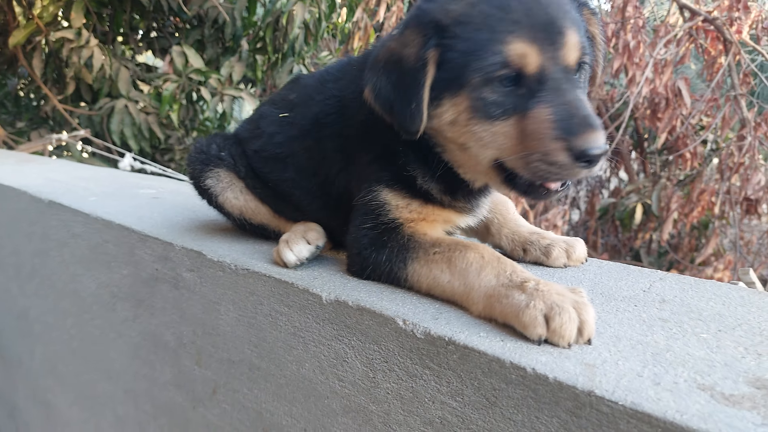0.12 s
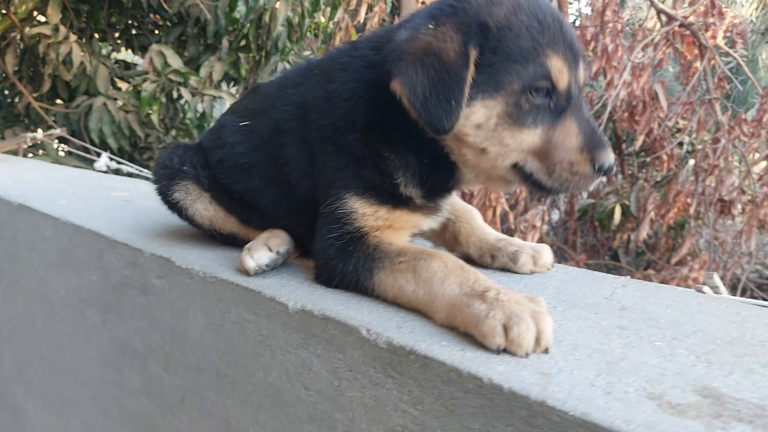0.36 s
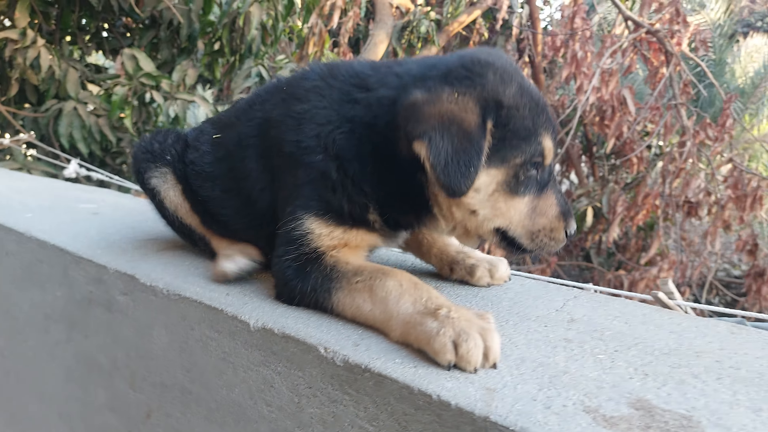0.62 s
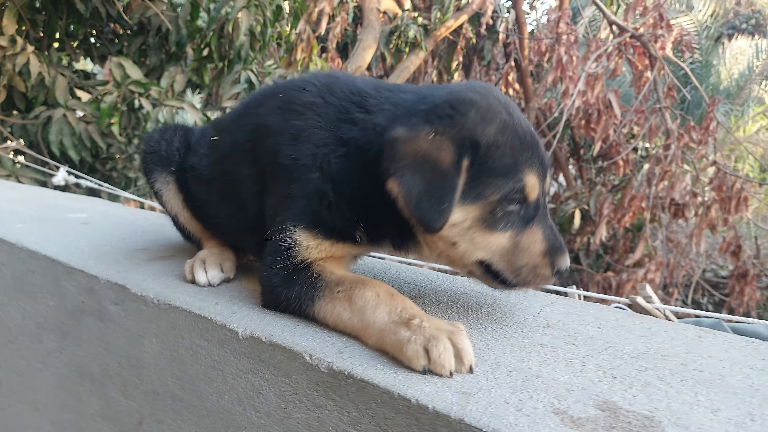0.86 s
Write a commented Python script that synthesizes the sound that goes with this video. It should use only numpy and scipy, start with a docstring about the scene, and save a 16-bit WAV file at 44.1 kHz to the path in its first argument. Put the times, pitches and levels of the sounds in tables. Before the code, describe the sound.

A puppy whimpers very close to a stereo phone microphone outdoors. The first cry is loudest, leaping up, then sliding down; a second follows, then weaker, shorter whines. After a pause with a gasp and tiny wet mouth ticks, a clear whine leads to two higher, stronger yelps. A very high whistle edges the voice. Leaf rustle, faint distant tones and low wind knocks lie behind, with a slight echo from nearby walls.

```python
"""Outdoors on a concrete ledge, a puppy lies and whimpers in short falling cries, close to a phone with two microphones.
Its vocal folds sing a stack of sine overtones; a very high whistle, chopped at the fold pitch, beats against them.
Gasps and one tiny low grunt, all of filtered noise, and tiny wet ticks fall among the cries.
Nearby walls add echoes and a short noise tail. Behind lie banded noise for rustling distance, faint far tones,
and low wind noise with knocks on the left port."""
import sys
import numpy as np
from scipy import signal
from scipy.fft import rfft, irfft, next_fast_len
from scipy.io import wavfile
from scipy.ndimage import uniform_filter1d

SR = 44100
rng = np.random.default_rng(int(sys.argv[2]) if len(sys.argv) > 2 else 0)


def ratio(d):
    """dB to gain"""
    e = np.asarray(d, float) / 20
    return 10 ** e


def wav_out(sig):
    """Save sig, one row per channel (or a flat mono array), as 16-bit PCM at SR to the path in sys.argv[1]."""
    wavfile.write(sys.argv[1], SR, np.round(np.clip(np.atleast_2d(sig).T, -1, 1) * 32767).astype(np.int16))


N = 271210
T = np.arange(N) / SR


def across(table, hz, column):
    """Read a spectrum table on a log-frequency axis."""
    rows = np.transpose(table)
    return np.interp(np.log(np.maximum(hz, 1)), np.log(rows[0]), rows[column])


def band(x, lo_hz, hi_hz):
    """Band-pass scaled to rms 1."""
    sos = signal.butter(2, [lo_hz, min(hi_hz, .45 * SR)], "bandpass", fs=SR, output="sos")
    y = signal.sosfilt(sos, x)
    return y / np.std(y)


def walk(rate, size=N):
    """Smooth random wander, spread near 1, from about rate new random values a second."""
    k = int(SR / rate)
    steps = np.repeat(rng.standard_normal(size // k + 1), k)
    return 1.66 * uniform_filter1d(uniform_filter1d(steps, k), k)[:size]


def play(table, attack_s, release_s):
    """Sample span, fade and interpolated columns of one call, swelling out of silence and dying back into it."""
    edge_db = -26  # level lost across each edge, on top of the fade
    s, *columns = np.transpose(table)
    span = slice(max(int((s[0] - attack_s) * SR), 0), int((s[-1] + release_s) * SR))
    before = (s[0] - T[span]) / attack_s
    after = (T[span] - s[-1]) / release_s
    edge = np.clip(np.maximum(before, after), 0, 1)
    hz, db, *rest = [np.interp(T[span], s, c) for c in columns]
    fade = np.clip(5 * (1 - edge), 0, 1)
    return span, fade, [hz, db + edge_db * edge, *rest]


def add(out, x, s):
    """Mix x in at time s."""
    i = int(s * SR)
    out[i:i + len(x)] += x[:N - i]


def notes(table):
    """Soft, slightly unsteady sine tones."""
    out = np.zeros(N)
    for s, length, hz, db in table:
        size = int(length * SR)
        turn = 2 * np.pi * np.cumsum(hz * (1 + 0.013 * walk(25, size))) / SR
        level = ratio(db + 1.8 * walk(34.0, size)) * np.sqrt(np.hanning(size))
        add(out, np.sqrt(2) * level * np.sin(turn), s)
    return out


# right microphone against the left: (frequency [Hz], level [dB], phase lead [rad])
RIGHT_PORT = [(706.4, 5.5, -0.38), (1010, 5, -1.1), (1290, -3, -1.3), (1450, -0.5, 0.39), (2020, 8, -0.27),
              (3100, 7.5, 0.48), (4800, 15, -0.099), (6350, -1, 1.1), (7300, -2, 2.1), (8100, 0.5, 3.7),
              (12000, 7, 4.5)]


def ports(x, pan_db, lead_ms):
    """One source at the two ports: level and phase differences, split evenly between left and right."""
    size = next_fast_len(len(x) + 512)
    hz = np.arange(size // 2 + 1) * SR / size
    turn = across(RIGHT_PORT, hz, column=2) + 2 * np.pi * hz * lead_ms / 1000
    half = ratio((across(RIGHT_PORT, hz, column=1) - pan_db) / 2) * np.exp(.5j * turn)
    spectrum = rfft(x, size)
    return np.array([irfft(spectrum / half, size), irfft(spectrum * half, size)])[:, :len(x)]


# the folds lose their beat for a moment and rasp:
# (time [s], length [s], phase scatter at its height [rad per overtone number])
BREAKS = [(0.315, 0.055, 0.296), (2.712, 0.035, 0.46)]


def fold_rasp():
    """How far the folds stumble at each moment, as a depth of phase scatter."""
    rasp = np.zeros(N)
    for s, length, rad in BREAKS:
        add(rasp, rad * np.sqrt(np.hanning(int(length * SR))), s)
    return rasp


# one table a cry: (time [s], fold pitch [Hz], fundamental level [dB], overtone offset [dB], mouth resonance [Hz])
CRIES = [
    [(0.0, 958, -11, 6.5, 3270), (0.027, 1149, -8, -3.5, 3510), (0.052, 1428, -17, 4, 2100),
     (0.054, 1639, -17.5, 5, 3550), (0.07, 1600, -18.5, 3.5, 3500), (0.086, 1550, -18.5, -5, 3460),
     (0.101, 1319, -16.5, 3.5, 3040), (0.164, 1333, -13, 2.5, 2920), (0.25, 1279, -20.5, 6.5, 3050),
     (0.27, 1186, -21.5, 14, 3150), (0.308, 1100, -22.5, 7, 3050), (0.345, 778, -29, 4, 2740),
     (0.368, 681, -31, -1.5, 2820)],
    [(0.55, 956.5, -26, 1.5, 2680), (0.568, 986, -24, 2.5, 3050), (0.59, 1151, -13, -2, 3130),
     (0.602, 1222, -24.5, -15, 2240), (0.604, 1425, -22, 2, 2440), (0.65, 1316, -28, -2, 2600),
     (0.661, 1113, -26.5, 5, 2800), (0.766, 1055, -28.5, 10, 2850), (0.778, 1027, -22.5, 6, 2910),
     (0.858, 939, -20, -0.5, 2930), (0.892, 789.6, -17, -15, 2430)],
    [(1.07, 1172, -37.5, 8.5, 2670), (1.112, 1281, -40.5, 16, 2700), (1.224, 1130, -36, 6.5, 2050),
     (1.238, 903, -33.5, 11.5, 2300), (1.272, 938, -27, 0.5, 2210), (1.286, 860, -28, -13, 2340)],
    [(1.472, 778, -34, -10.5, 2020), (1.51, 882, -25, -14.5, 1994)],
    [(1.697, 780.6, -29.5, -18, 2180), (1.741, 1035, -28.5, -9.5, 2100), (1.775, 1156, -25.5, -10, 2370),
     (1.841, 1120, -19, -7.5, 2480), (1.871, 1027, -29.5, -10, 1770), (1.908, 952, -34.5, -3, 2280)],
    [(2.272, 755, -35.5, -24, 2210), (2.302, 1033, -30.5, -6, 2120), (2.328, 1017, -26.5, -6, 2100),
     (2.342, 909, -22.5, -14, 2100)],
    [(2.528, 671.7, -43.5, 4.5, 2320), (2.546, 727.6, -30.5, -27, 2490), (2.572, 1006, -28, -10.5, 2030),
     (2.65, 961, -21, -11, 2070), (2.672, 883, -22, -5.5, 2430), (2.712, 834.4, -22.5, -11, 2190),
     (2.726, 931, -22, -6.5, 1980), (2.746, 855, -25, -12, 2630), (2.754, 728.5, -27, -1.5, 2600),
     (2.782, 796.5, -18, -23, 2760), (2.798, 777, -33, 0, 2530)],
    [(3.309, 668, -44.5, -2, 2500), (3.338, 954, -33, -16, 2020), (3.394, 1056, -28.5, -0.5, 1900),
     (3.41, 1097, -22, -9.5, 2400), (3.46, 1077, -23.5, 1.5, 2350), (3.496, 952, -28.5, -7, 2180),
     (3.52, 950, -38.5, 0, 2610)],
    [(4.826, 1101, -25, -7, 1960), (4.858, 1134, -32, -14, 2620), (4.932, 1115, -18.5, -5.5, 2120),
     (4.975, 1067, -21.5, -5.5, 2220), (5.112, 1019, -28, 4.5, 2470), (5.132, 980, -20.5, -6.5, 2350),
     (5.142, 778, -30, -12, 2820)],
    [(5.415, 1494, -24.5, -10, 1240), (5.47, 1470, -22, -7.5, 2060), (5.485, 1448, -18.5, -0.5, 2190),
     (5.578, 1406, -18, -4.5, 2550), (5.6, 1317, -26, -2, 2700), (5.61, 1094, -21, -15, 2300),
     (5.62, 810, -22.5, -5, 2270)],
    [(5.804, 1406, -27.5, 6, 2850), (5.838, 1471, -17, -3.5, 2800), (5.874, 1443, -17, -3.5, 2800),
     (5.89, 1434, -15, 3, 2870), (5.926, 1395, -16, 1, 2800), (5.975, 1348, -23.5, -4, 2650),
     (5.992, 1208, -22.5, -5, 2570), (6.005, 917, -20, -29, 2510)],
]
# head angle and voice colour in each cry: (left minus right [dB], right lead [ms], hoarseness before slides [dB],
# treble tilt [dB per octave], throat [Hz], its lift or dip [dB])
HEAD = [(7, 0.04, -36, 2, 4000, 6), (5, 0.092, -37, 2.5, 4560, 6), (5, .12, -25.5, 4.5, 3600, -7.5),
        (1.5, 0.057, -36.5, -2.4, 3400, -7), (5, 0.036, -36.5, 9.5, 4400, 1),
        (2.5, 0.045, -31, -8, 3400, 9), (5.5, 0.039, -29, 8, 3660, 7.5), (7, .05, -30, -4.5, 3700, 4.5),
        (8.5, 0.025, -33.5, -2, 5200, -12), (1.5, .165, -37.5, 4.5, 6300, 10),
        (2, .17, -35, 6.5, 4100, -10)]
# colour of the overtones against the fundamental: (frequency [Hz], level [dB])
MOUTH = [(1300, 0.5), (1800, -22), (2400, -29.5), (3200, -24), (4200, -29), (5000, -36.5), (5700, -41),
         (7000, -48.5), (9000, -44.5), (12000, -52), (15500, -54.5)]


def overtone_db(hz, over_db, mouth_hz, tilt_db, throat_hz, throat_db):
    """Level of an overtone against the fundamental; mouth and throat lift or dip whatever lies near them."""
    high_db = over_db + across(MOUTH, hz, column=1)
    high_db += tilt_db * np.maximum(np.log2(hz / 3320), 0)  # tilts only above 3320 Hz
    high_db += 19.5 / (1 + (np.log2(hz / mouth_hz) / 0.17) ** 2)  # peak dB, half width in octaves
    return high_db + throat_db / (1 + (np.log2(hz / throat_hz) / 0.21) ** 4)


def cries():
    """Vocal folds sing 18 harmonics with hoarse air; also returns fold phase and how firmly they sound."""
    blur_rad_per_octave_s, blur_most_rad, blur_from_hz = .2, 1.8, 4600
    voice, phase, voiced = np.zeros(N), np.zeros(N), np.zeros(N)
    rasp = fold_rasp()
    for cry, (_, _, hoarse_db, tilt_db, throat_hz, throat_db) in zip(CRIES, HEAD):
        span, fade, (hz, db, over_db, mouth_hz) = play(cry, attack_s=.009, release_s=0.0074)
        size = len(fade)
        slide = uniform_filter1d(np.abs(np.gradient(np.log2(hz))) * SR, size=800)  # octaves a second
        blur = np.clip(blur_rad_per_octave_s * slide, 0, blur_most_rad)
        phase[span] = 2 * np.pi * np.cumsum(hz * (1 + 0.0025 * walk(150, size))) / SR
        voiced[span] = fade * np.clip(ratio(db + 43.5), 0, 1)
        tone = np.sin(phase[span])
        stumble = rasp[span] * walk(500, size)
        for k in range(2, 19):
            high_db = overtone_db(k * hz, over_db, mouth_hz, tilt_db, throat_hz, throat_db)
            high_db += min(.55 * k, 2.2) * walk(45, size)
            # a sliding pitch smears the high overtones
            smear = blur * np.clip((k * hz - blur_from_hz) / 2500, 0, 1) * walk(1100, size)
            turn = k * phase[span] + k * k + smear + k * stumble
            tone += (k * hz < 16000) * ratio(high_db) * np.sin(turn)
        # turbulent air, puffed once a fold cycle; sliding and rasping roughen it
        puffs = 1 + 0.66 * np.sin(phase[span])
        air_db = hoarse_db + 3.5 * (blur + 1.1 * rasp[span])
        air = ratio(air_db) * band(rng.standard_normal(size), 700, 5200) * puffs
        voice[span] = fade * ratio(db + 0.31 * walk(90, size)) * (np.sqrt(2) * tone + air)
    return voice, phase, voiced


# one table a whistle: (time [s], pitch [Hz], level of the pure tone [dB])
WHISTLES = [
    [(0.056, 8940, -40.5), (0.09, 8410, -48), (0.125, 8330, -48)],
    [(0.572, 7880, -60), (0.596, 8180, -44.5), (0.61, 8600, -40)],
    [(1.07, 7330, -56), (1.09, 7760, -45), (1.22, 7450, -44), (1.25, 8030, -61.5), (1.272, 8160, -42.5),
     (1.282, 9090, -40.5)],
    [(1.475, 7840, -58.5), (1.5, 7890, -56.5), (1.515, 8800, -45.5)],
    [(1.711, 8150, -58), (1.765, 7460, -41.5), (1.787, 8540, -48), (1.877, 8630, -55.5),
     (1.899, 8890, -54.5)],
    [(2.29, 7400, -62), (2.33, 7610, -56), (2.345, 8580, -53)],
    [(2.557, 7510, -56.5), (2.627, 7570, -49.5), (2.675, 8200, -53.5), (2.77, 7965, -58),
     (2.79, 8540, -51.5), (2.81, 7910, -56.5)],
    [(3.345, 7660, -55), (3.37, 8430, -58), (3.426, 7895, -55), (3.518, 7880, -51.5), (3.55, 7820, -60)],
    [(4.791, 7270, -39), (4.861, 7035, -25), (4.873, 7455, -27), (4.932, 7350, -32), (4.942, 7170, -33),
     (5.125, 7106, -37), (5.14, 7630, -46)],
    [(5.365, 7210, -43), (5.387, 7960, -42.5), (5.459, 7570, -43), (5.589, 7390, -26), (5.608, 7115, -34),
     (5.615, 7840, -32)],
    [(5.806, 7960, -43), (5.896, 8110, -34), (5.992, 7910, -44.5), (6.005, 8160, -37)],
]
# lines at the whistle pitch plus multiples of fold pitch: (multiple [fold pitches], relative level [dB])
SIDE_LINES = [(-2, -16.5), (-1, 0), (1, -2), (2, -10.5), (3, -17)]
# for each whistle, against its pure tone: (side lines [dB], octave [dB], jet hiss [dB])
WHISTLE_MIX = [(-7, -21.5, -5.5), (-15.5, -17, -26), (-14, -8, -14.5), (-3, -21, -9), (-12, -17, -12),
               (-8.5, -26.5, 2), (-6, -21.5, -6.5), (-11, -24.5, -10.5), (-31.5, -31, -32.5),
               (-20.5, -17, -23.5), (-11, -17.5, -22.5)]


def whistles(phase, voiced):
    """A high whistle with its octave and jet hiss, chopped into side lines by the vibrating folds."""
    out = np.zeros(N)
    for whistle, (side_db, octave_db, hiss_db) in zip(WHISTLES, WHISTLE_MIX):
        span, fade, (hz, db) = play(whistle, attack_s=0.029, release_s=0.02)
        size = len(fade)
        pitch = uniform_filter1d(hz, size=300) * (1 + 0.0044 * walk(110, size))
        turn = 2 * np.pi * np.cumsum(pitch) / SR
        lines = sum(ratio(d + 3.0 * walk(35, size)) * np.exp(1j * round(k) * phase[span]) for k, d in SIDE_LINES)
        chop = voiced[span] * lines
        tone = np.exp(1j * turn) * (1 + ratio(side_db) * chop)
        tone += ratio(octave_db) * np.exp(2j * turn) * (1 + ratio(-6.5) * chop)
        hiss = ratio(hiss_db) * band(rng.standard_normal(size), 5100, 12500)
        out[span] += np.sqrt(2) * fade * ratio(db + 0.83 * walk(60, size)) * (tone.imag + hiss)
    return out


# lower-register tones under the cry: (time [s], length [s], frequency [Hz], level [dB])
LINGERS = [(0.048, 0.034, 1130, -27), (0.595, 0.055, 1223, -34.5)]


def lingering_register():
    """After an upward jump the lower register lingers under the cry as a soft tone."""
    return notes(LINGERS)


def puppy():
    """Folds, whistle and lingering register together, each cry reaching the ports from its own head angle."""
    voice, phase, voiced = cries()
    voice += whistles(phase, voiced) + lingering_register()
    starts = [0] + [int((cry[0][0] - .06) * SR) for cry in CRIES[1:]] + [N]
    near = []
    for a, b, (pan_db, lead_ms, *_) in zip(starts, starts[1:], HEAD):
        near.append(ports(voice[a:b], pan_db, lead_ms))
    return np.concatenate(near, axis=1)


# gasps, and one tiny low grunt at 0.485 s:
# (time [s], length [s], level [dB], resonance [Hz], relative hiss [dB])
GASPS_AND_GRUNT = [(0.406, 0.067, -54, 2560, -0.5), (0.485, 0.0207, -51.5, 483, -28.5),
                   (1.017, .05, -58.5, 1070, -6), (2.373, 0.014, -50, 2190, -9),
                   (3.479, 0.3, -46.5, 1666, -22), (3.828, .05, -53.5, 2400, 4.5)]


def gasps_and_grunt():
    """Gasps and one tiny low grunt: noise through a narrow resonance, with a sharp onset that dies away."""
    out = np.zeros(N)
    for s, length, db, hz, hiss_db in GASPS_AND_GRUNT:
        t = np.arange(int(length * SR)) / SR
        throat_noise, hiss_noise = rng.standard_normal((2, len(t)))
        shape = np.clip(t / 0.0008, 0, 1) * (np.sqrt(1 - t / length) + 1.6 * np.exp(-t / 0.00285))
        puff = band(throat_noise, 0.946 * hz, 1.075 * hz)
        puff += ratio(-6.0) * band(throat_noise, 0.97 * hz, 1.49 * hz)
        puff += ratio(hiss_db) * band(hiss_noise, 780, 14000)
        add(out, ratio(db) * shape * puff, s)
    return out


# lips and tongue ticking: (time [s], level before the decay [dB])
TICKS = [(1.28, -44.5), (1.5131, -48), (3.5191, -42.5), (3.7891, -41.5), (3.8219, -38.5), (3.9824, -47),
         (4.2289, -43.5), (4.2503, -39)]


def ticks():
    """Tiny wet mouth ticks: bursts of treble noise that die within milliseconds."""
    out = np.zeros(N)
    t = np.arange(int(0.014 * SR)) / SR
    for s, db in TICKS:
        burst = band(rng.standard_normal(len(t)), 4600, 15000)
        add(out, ratio(db) * np.exp(-t / 0.0012) * burst, s)
    return out


# wall echoes: (delay at the left port [ms], level [dB])
ECHOES = [(14, -28), (36, -27)]


def yard(x):
    """A few wall echoes and a short diffuse tail, mostly alike at the two ports."""
    t60_s, tail_db = 0.3, -22
    unlike = .3  # each port's own noise against the shared noise
    t = np.arange(int(.4 * SR)) / SR
    noise = rng.standard_normal(len(t)) + unlike * rng.standard_normal((2, len(t)))
    response = noise * 1000 ** (-t / t60_s) * np.clip(t / 0.0059, 0, 1)
    response *= ratio(tail_db) / np.sqrt(np.sum(response ** 2) / 2)
    for ms, db in ECHOES:
        # one sample later on the right
        response[[0, 1], int(ms * SR / 1000) + np.array([0, 1])] += ratio(db)
    # air and leaves take the treble out of the echoes
    dull = signal.lfilter([.35], [1, -.65], x, axis=1)
    return signal.fftconvolve(dull, response, axes=1)[:, :N]


# a far wavering tone: (time [s], frequency [Hz], level [dB])
FAR_TONE = [(3.95, 520.5, -66), (4.02, 540, -52), (4.07, 585, -57), (4.7, 571.6, -46.5), (4.8, 601.5, -53),
            (5.17, 610.5, -58.5), (5.55, 578.4, -47.5), (5.95, 606, -59.5), (6.15, 609.5, -60)]


def far_tone():
    """A thin sine blurred by distance: pitch and level waver at random."""
    s, hz, db = np.transpose(FAR_TONE)
    turn = 2 * np.pi * np.cumsum(np.interp(T, s, hz) * (1 + 0.0085 * walk(24))) / SR
    return np.sqrt(2) * ratio(np.interp(T, s, db, left=-120) + 3.2 * walk(40)) * np.sin(turn)


# faint low notes in the distance: (time [s], length [s], frequency [Hz], level [dB])
LOW_NOTES = [(4.087, 0.33, 273.4, -56.5), (5.128, 0.033, 316, -47.5), (5.461, 0.08, 284, -53),
             (5.485, 0.13, 347, -54)]


def low_notes():
    """Faint low sine notes in the distance."""
    return notes(LOW_NOTES)


# wind knocking on the left port: (time [s], peak [dB])
KNOCKS = [(2.574, -34), (2.671, -34), (2.85, -32.5), (3.109, -33.5), (3.27, -35), (3.36, -23), (4.521, -23),
          (4.621, -28.5), (4.9, -29.5)]
# background, shared by wind and rustle: (time [s], rustle level [dB], wind level before port offsets [dB])
AIR = [(0, -60.5, -62.5), (0.499, -59, -79), (1.349, -59, -64), (1.8, -54, -67), (2.3, -50.5, -58.5),
       (2.7, -50.5, -55.5), (3.1, -49.5, -54.5), (3.501, -46.5, -57.5), (4.001, -49.5, -64),
       (4.7, -48, -50), (5.302, -48, -62.5), (6.15, -51.5, -59)]


def wind():
    """Low turbulence on each port, stronger on the left, with single knocks."""
    s, _, db = np.transpose(AIR)
    gusts = []
    for side_db in (2, -8):  # left, right
        gusts.append(ratio(side_db + 5.2 * walk(30)) * band(rng.standard_normal(N), 40, 140))
    gusts = np.array(gusts) * ratio(np.interp(T, s, db))
    # a knock is one swing down and up
    t = np.arange(int(.03 * SR)) / SR / 0.0022 - 4
    for s, db in KNOCKS:
        add(gusts[0], ratio(db) * t * np.exp(.5 - t ** 2 / 2), s - .009)
    return gusts


# colour of the rustle: (frequency [Hz], relative density [dB per Hz])
RUSTLE = [(60, -14.5), (130, -11.5), (270, -12.5), (500, -14.5), (1000, -21.5), (1900, -19), (4300, -22.5),
          (6000, -27.5), (9700, -35), (15500, -34)]


def rustle():
    """Half-octave noise bands of leaves and far traffic; more alike at the ports in the bass than in the treble."""
    out = 0
    for hz in 60 * 2 ** np.arange(0, 8.1, .5):
        mid, side = (band(rng.standard_normal(N), hz / 1.19, hz * 1.19) for _ in range(2))
        gain = ratio(across(RUSTLE, hz, column=1) + 0.51 * walk(11.0)) * np.sqrt(hz)
        share = np.clip(0.056 + hz / 3000, 0, .52)  # power of the part opposed at the ports
        opposed = side * np.array([[1], [-1]])
        out = out + gain * (np.sqrt(1 - share) * mid + np.sqrt(share) * opposed)
    s, db, _ = np.transpose(AIR)
    return out / np.std(out) * ratio(np.interp(T, s, db))


def scene():
    """Puppy, its echoes and the open air."""
    near = puppy() + ports(gasps_and_grunt() + ticks(), pan_db=0, lead_ms=0.046)
    far = ports(far_tone() + low_notes(), pan_db=0, lead_ms=0.2)
    return near + yard(near) + far + wind() + rustle()


def top_cut(x):
    """Nothing passes above the cut-off."""
    return signal.sosfilt(signal.butter(12, 15810, fs=SR, output="sos"), x)


def record(dry):
    """The phone rounds the loudest peaks, then trims the deepest bass and the top."""
    limit, low_cut_hz, top_hz = .97, 27, 15700
    dry = dry / (1 + (dry / limit) ** 6) ** (1 / 6)
    dry = signal.sosfilt(signal.butter(2, low_cut_hz, "highpass", fs=SR, output="sos"), dry)
    dry = signal.sosfilt(signal.ellip(8, .2, 70, top_hz, fs=SR, output="sos"), dry)
    return top_cut(dry)


dry = scene()
out = record(dry)
wav_out(out)
```